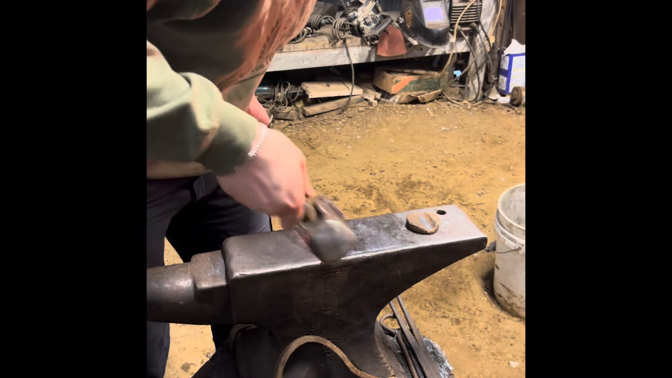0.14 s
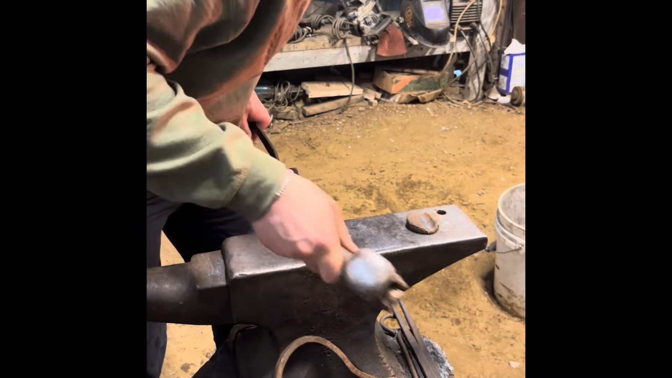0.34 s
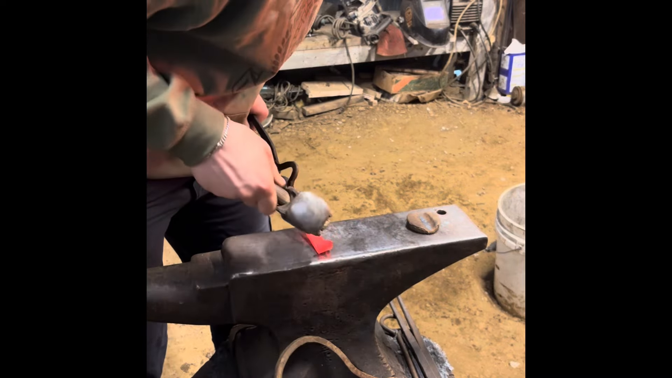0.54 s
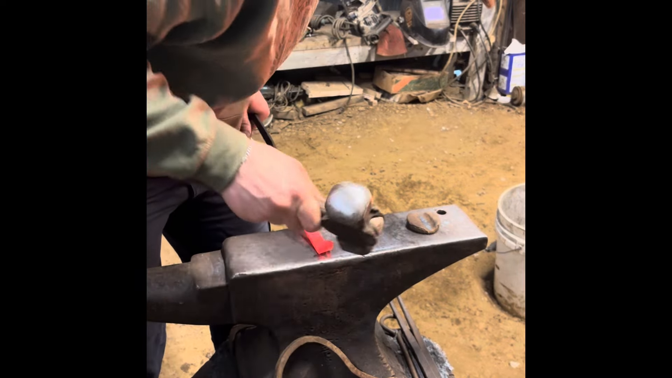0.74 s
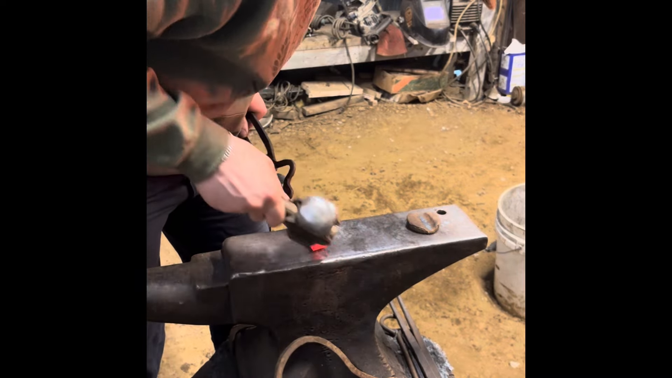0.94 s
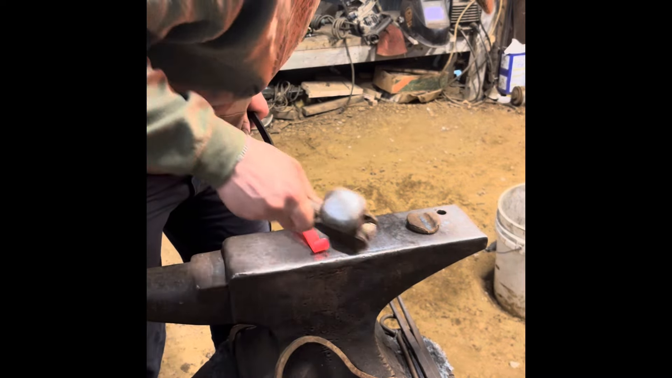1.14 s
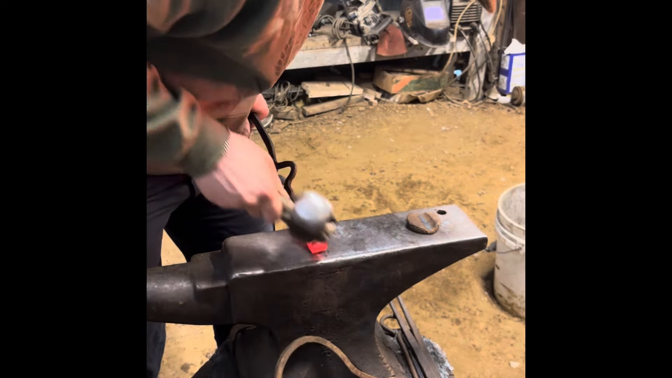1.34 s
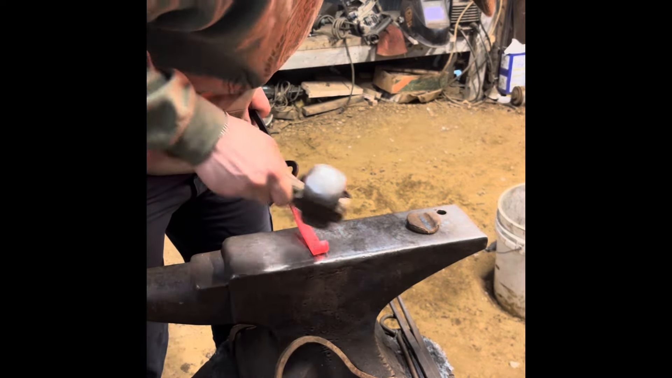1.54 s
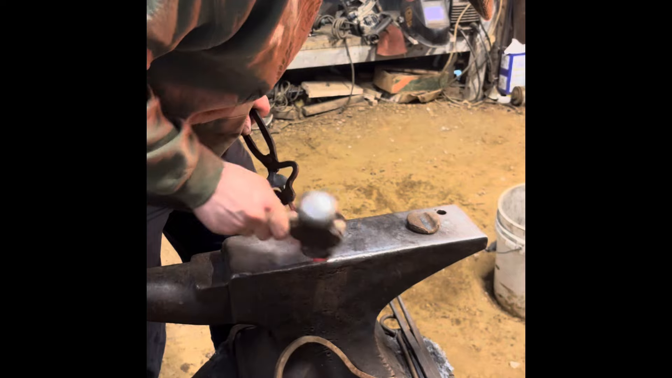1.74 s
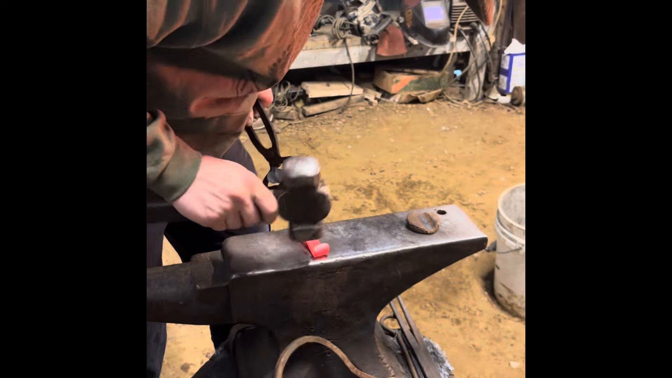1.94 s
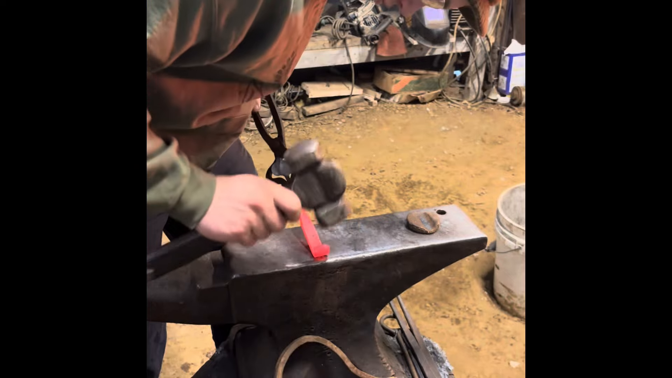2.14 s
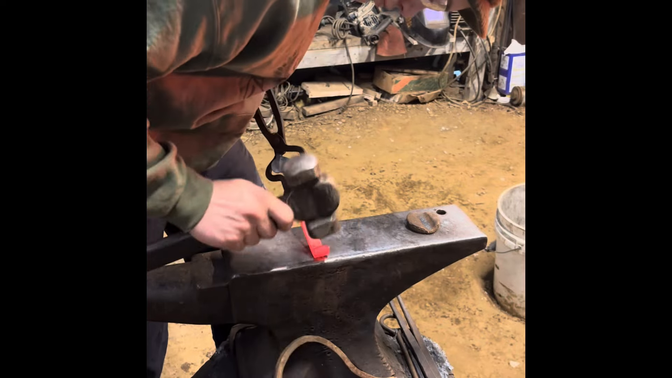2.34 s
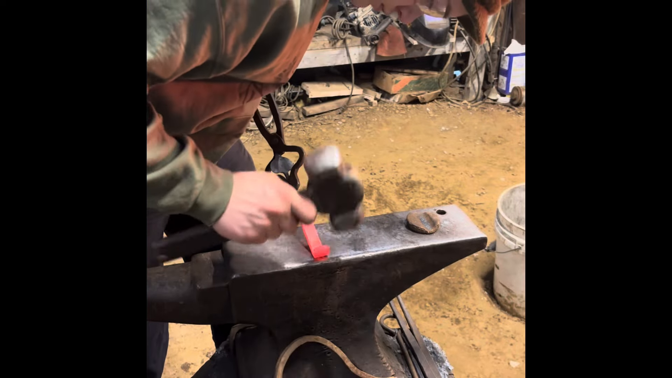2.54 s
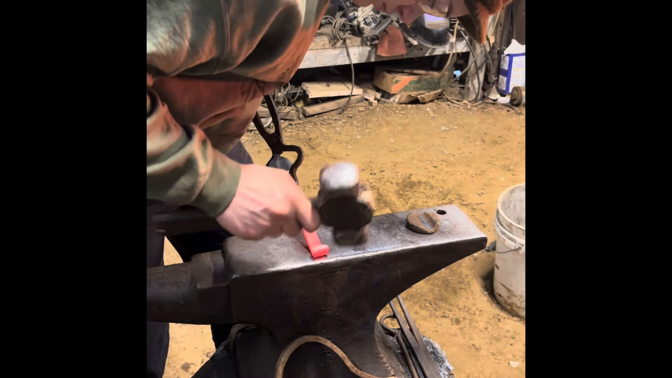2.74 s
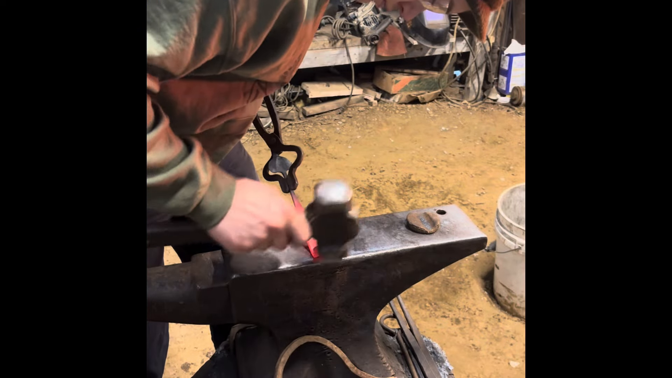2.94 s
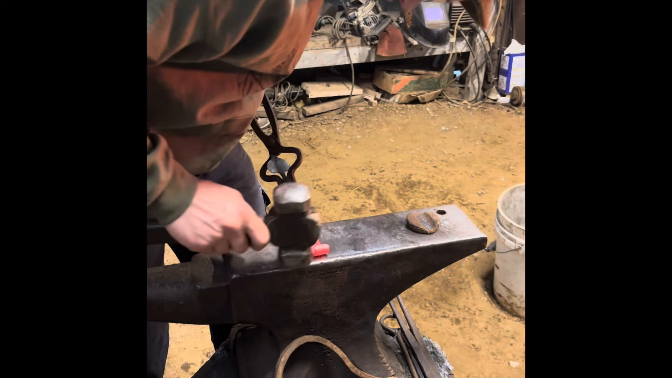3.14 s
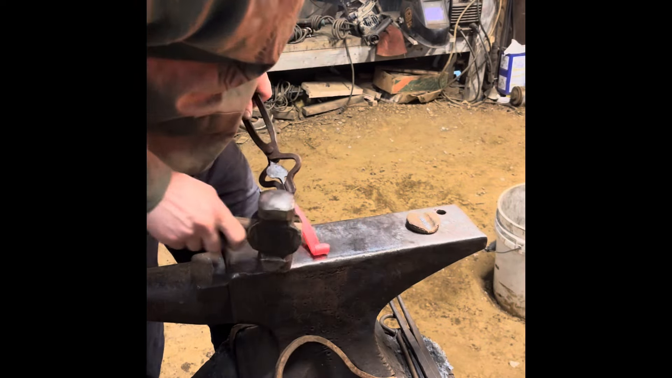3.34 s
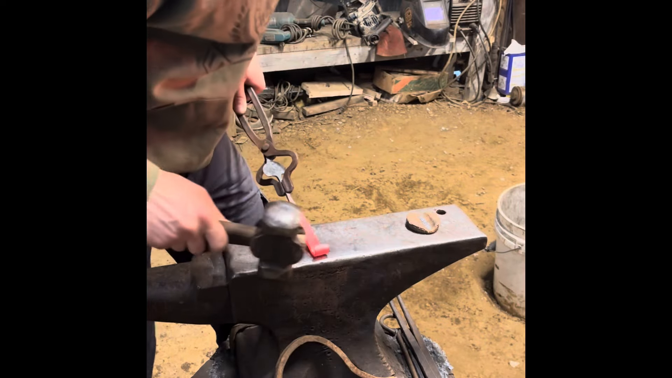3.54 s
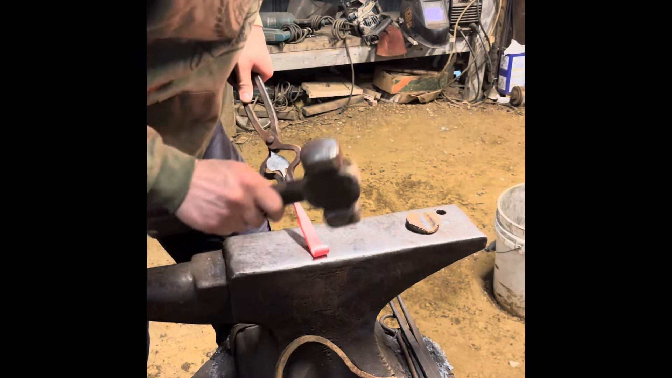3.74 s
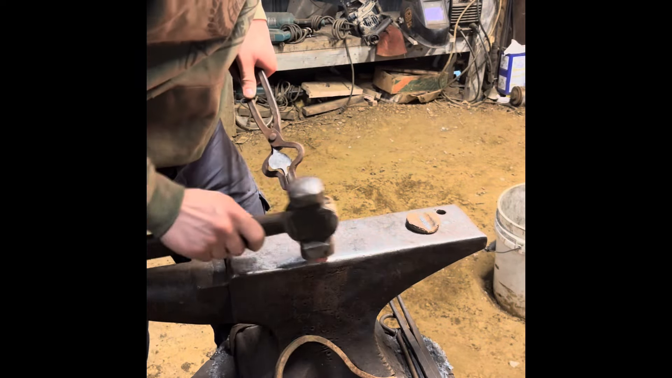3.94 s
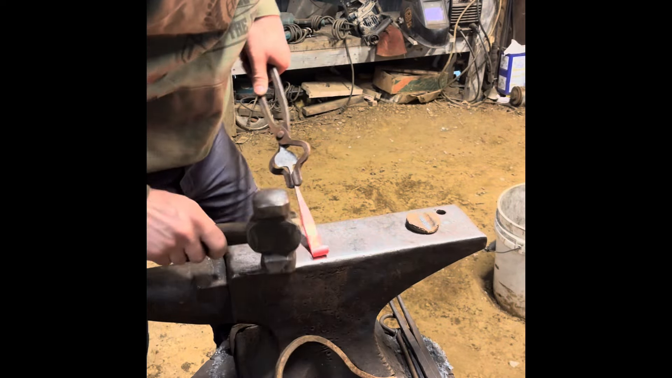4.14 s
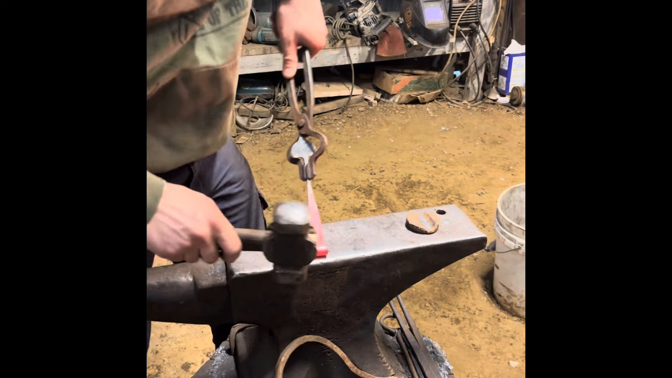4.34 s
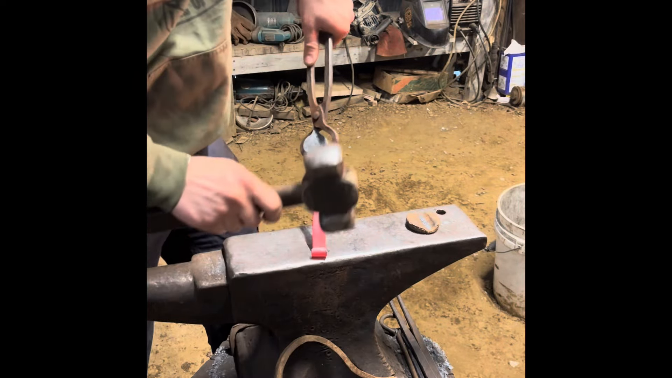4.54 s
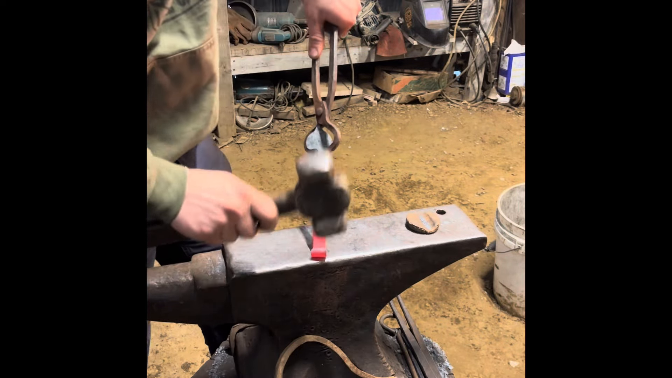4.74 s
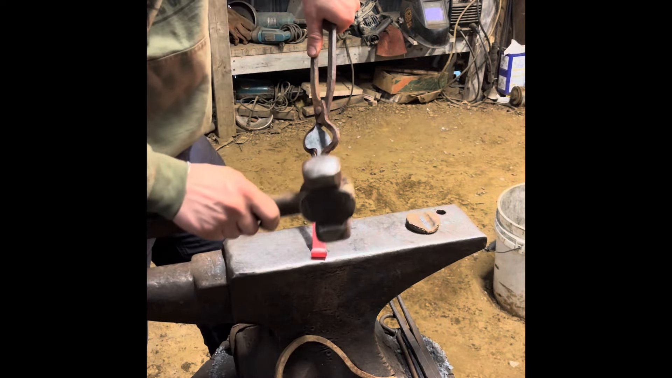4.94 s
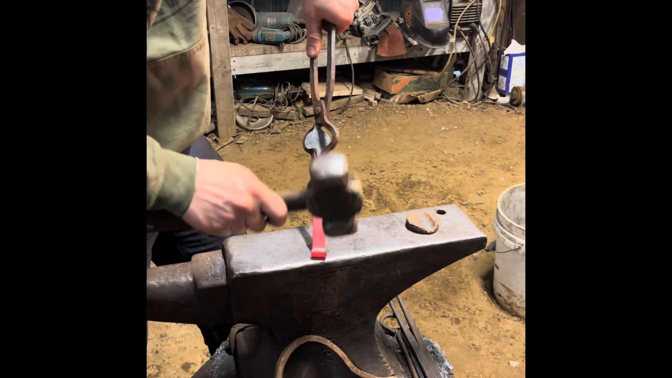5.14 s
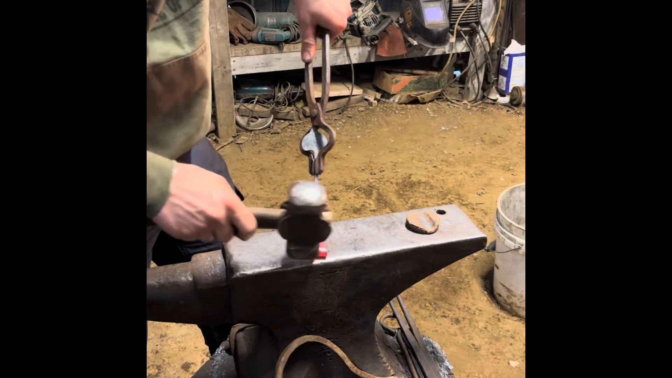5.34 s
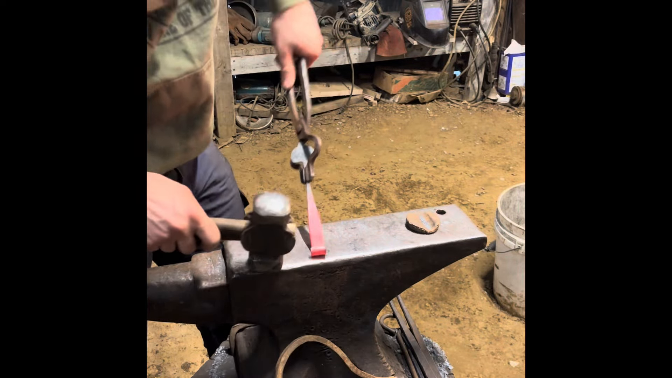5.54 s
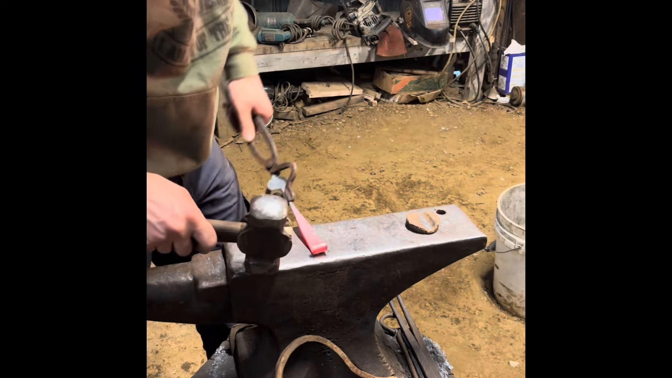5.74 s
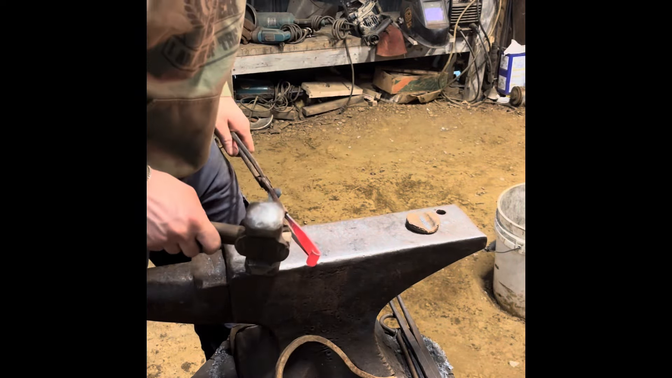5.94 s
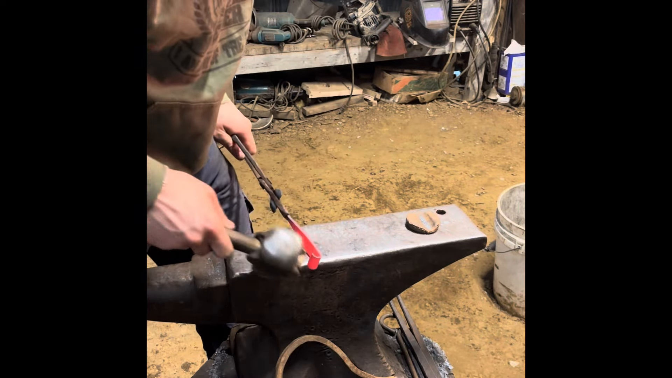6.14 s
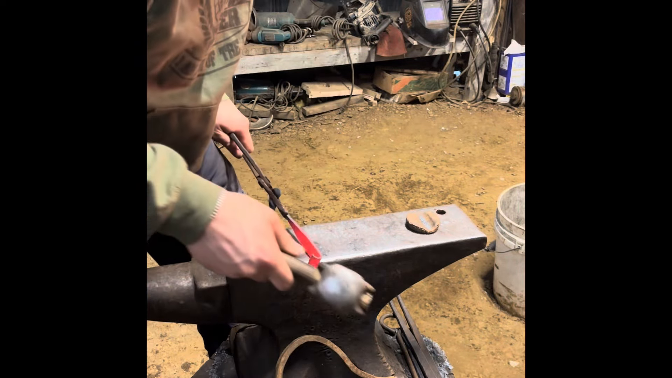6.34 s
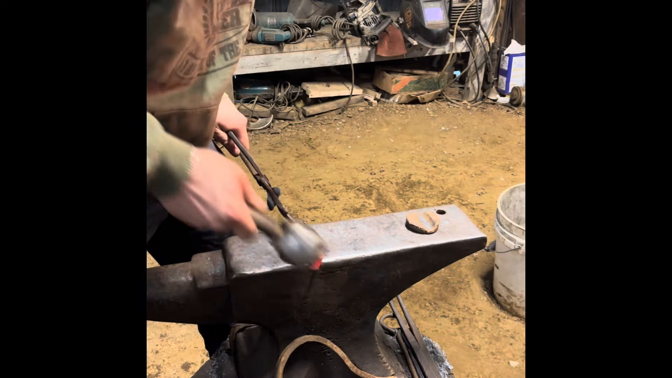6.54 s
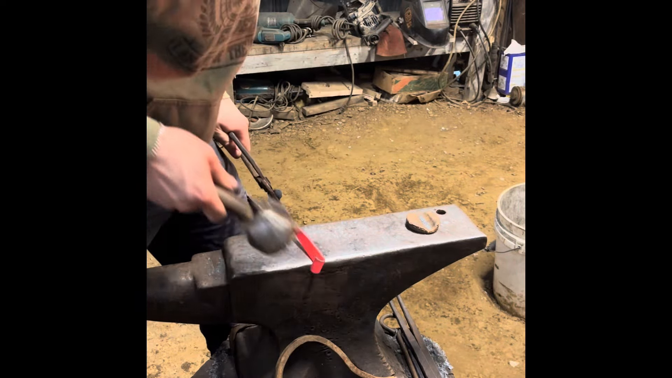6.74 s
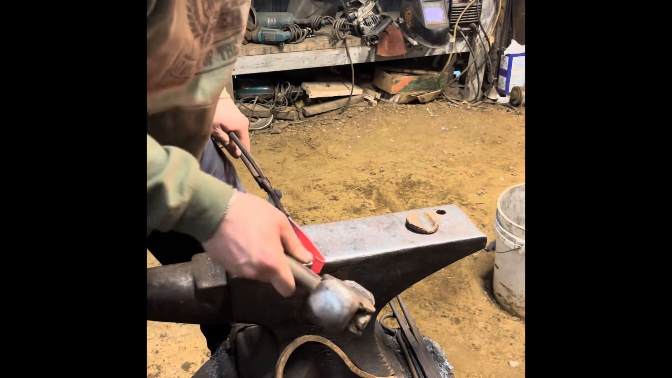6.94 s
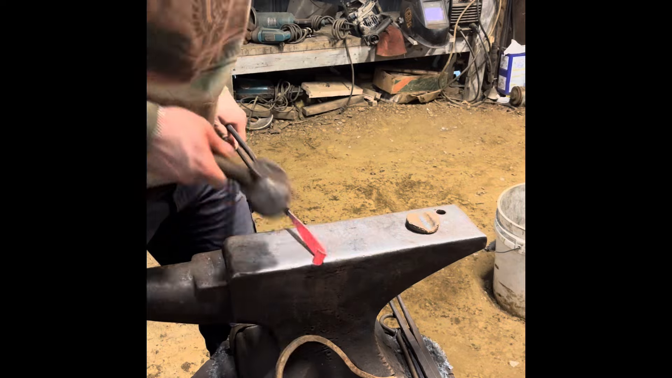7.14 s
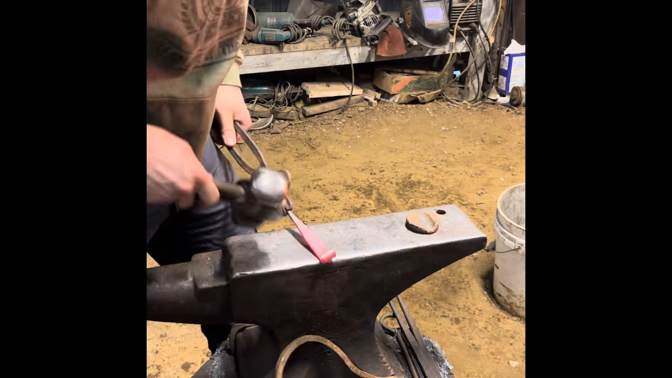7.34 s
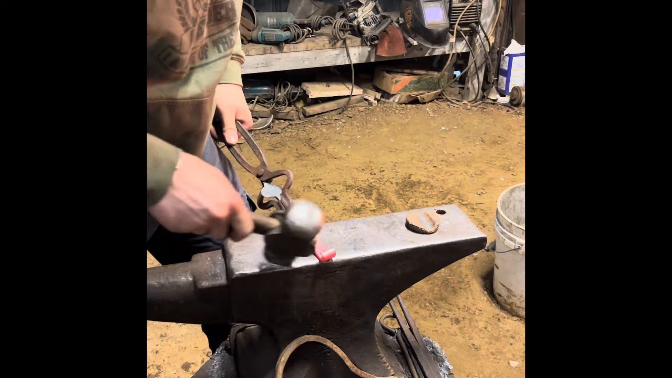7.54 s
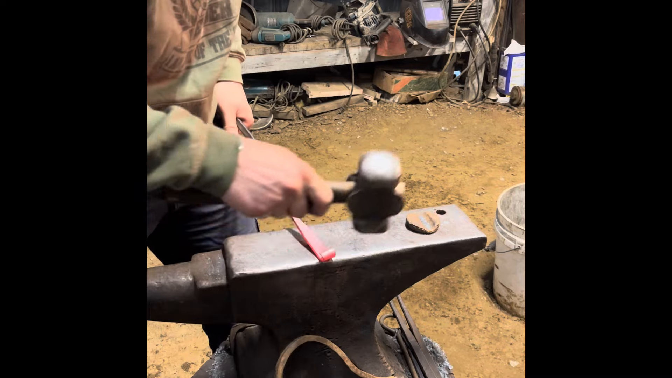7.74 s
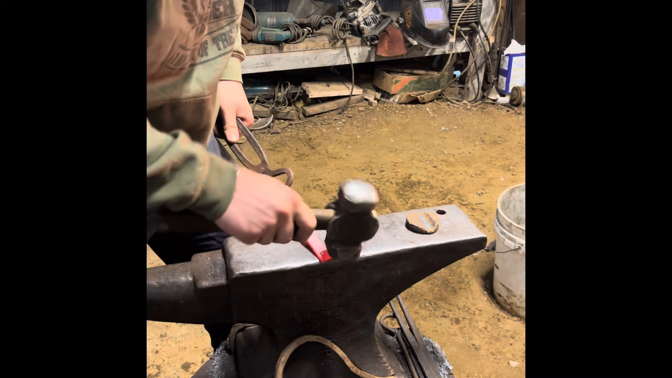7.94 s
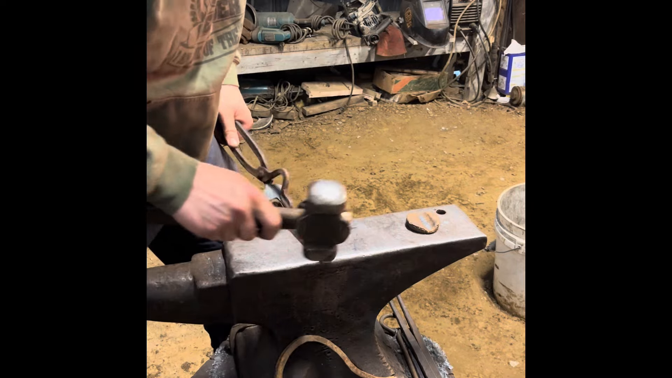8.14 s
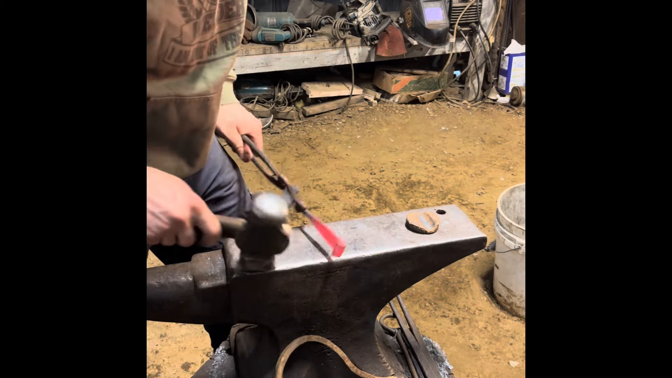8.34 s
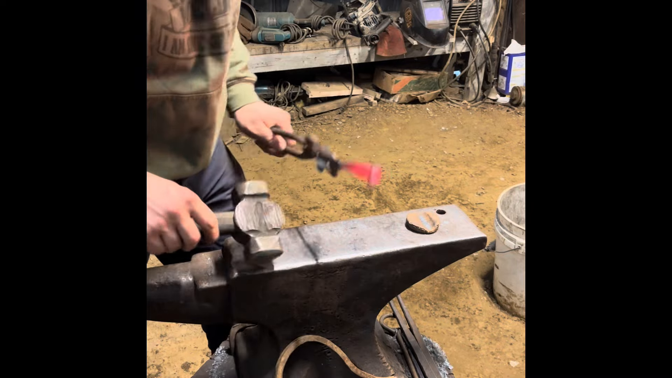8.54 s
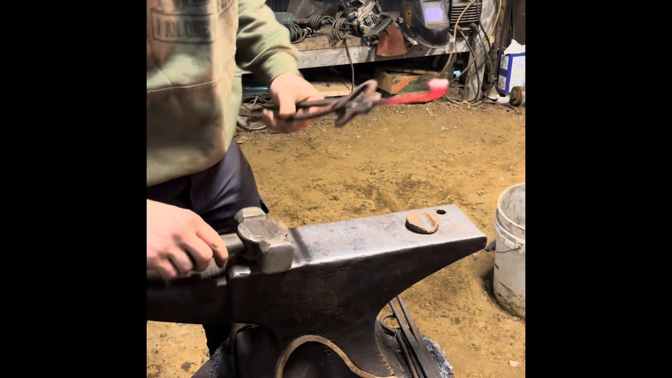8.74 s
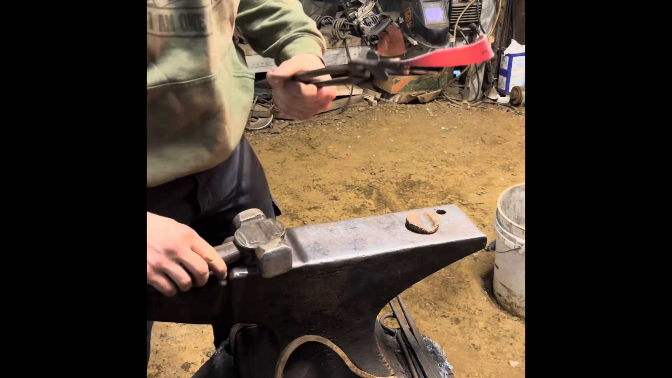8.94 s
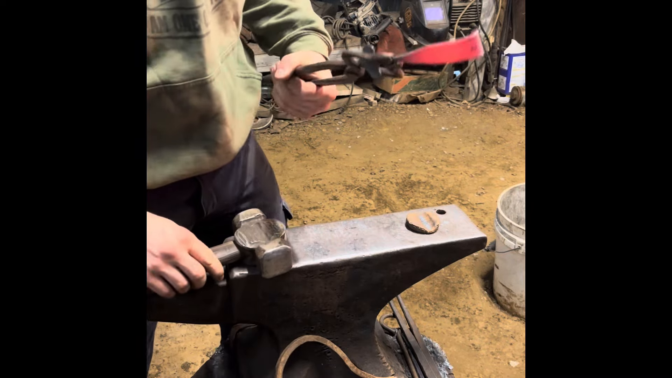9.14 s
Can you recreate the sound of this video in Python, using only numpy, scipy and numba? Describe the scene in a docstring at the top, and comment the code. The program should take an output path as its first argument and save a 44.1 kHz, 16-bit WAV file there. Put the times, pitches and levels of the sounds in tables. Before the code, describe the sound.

Close anvil work in a small shed: dead, thudding blows on a hot bar, sharp ringing hammer bounces quickening to rest, over constant forge roar.

```python
"""A smith's hammer works a hot bar on an anvil: each blow is a dead crack of noise with a low thud and a faint ring.
Between blows the hammer drops on the bare face and bounces to rest; sharp knocks start fading ring tones.
A gas forge roars close by, made of noise shaped by hollow tones, with a wavering whistle.
Fading noise gives the shed's short bright echo. Two microphone ports hear it all a little differently."""
import sys
import numpy as np
from scipy import signal
from scipy.fft import rfft, irfft, next_fast_len
from scipy.io import wavfile
from scipy.ndimage import uniform_filter1d
from numba import njit

SR = 44100
rng = np.random.default_rng(int(sys.argv[2]) if len(sys.argv) > 2 else 0)


def to_wav(sig):
    """Store sig (one row per channel, or 1-D mono) as 16-bit WAV at the path in sys.argv[1].

    Samples outside -1..1 are clipped; the rate is SR.
    """
    pcm = np.clip(np.atleast_2d(sig), -1, 1) * 32767
    pcm = np.round(pcm).astype(np.int16)
    wavfile.write(sys.argv[1], SR, pcm.T)  # frames by channels


N = 405279
EARLY = 2048  # samples of lead-in, for a blow that falls just before the start
STEP = 64  # samples for which a ring's waver value holds


def undb(db):
    """Turns decibels into a gain."""
    return 10 ** (np.asarray(db) / 20)


def along(table, hz):
    """Reads a table of (pitch_hz, value) between its rows, with pitch on a log axis."""
    pitch_hz, value = np.transpose(table)
    return np.interp(np.log(np.maximum(hz, 1)), np.log(pitch_hz), value)


def colour(x, gain):
    """Changes the strength (and timing) of each pitch in x by gain(hz)."""
    size = next_fast_len(x.shape[-1] + EARLY)
    hz = np.arange(size // 2 + 1) * SR / size
    return irfft(rfft(x, size) * gain(hz), size)[..., :x.shape[-1]]


def unit(x):
    """Scales x to an average (rms) level of 1."""
    return x / np.sqrt(np.mean(x ** 2))


def smooth_twice(x, width):
    """Smooths sudden changes with two running averages."""
    return uniform_filter1d(uniform_filter1d(x, width), width)


@njit
def ring(at, gain, turn, decay, kept, damp, swell, waver, step, length):
    """Each strike drives the modes and chokes their old ring; its damping holds until the next strike."""
    out = np.zeros((2, length))
    for m in range(len(turn)):
        # z is the ringing mode; spin turns and fades it by one sample
        z, spin, push = 0j, 0j, 0j
        choke, strike, left = 1., 0, 0
        for i in range(length):
            if strike < len(at) and i >= at[strike]:
                spin = np.exp(1j * turn[m] - decay[m] * damp[strike])
                push = gain[strike, m] / swell + 0j
                if abs(z) > 1e-6:
                    push *= z / abs(z)  # the new ring joins in step with what is left
                choke = kept[strike] ** (1 / swell)
                left = swell
                strike += 1
            if left > 0:
                z = choke * z + push
                push *= spin
                left -= 1
            elif abs(z.real) + abs(z.imag) < 1e-7:
                continue
            z *= spin
            out[0, i] += (z * waver[m, 0, i // step]).imag
            out[1, i] += (z * waver[m, 1, i // step]).imag
    return out


def wavers(hz):
    """Each mode flickers as the moving head and arm shade and reflect it; some drift between the ports."""
    waver_db, waver_per_s = 3.5, 45
    drift_rad, drift_per_s = .9, 9
    drift_low_hz, drift_high_hz = 3450, 4700  # only modes in this band drift
    steps = (N + EARLY) // STEP + 1

    def slow(rate):
        noise = rng.standard_normal((len(hz), 1, steps))
        return unit(smooth_twice(noise, int(SR / STEP / rate)))

    drifting = ((hz > drift_low_hz) & (hz < drift_high_hz))[:, None, None]
    drift = drifting * drift_rad * slow(drift_per_s)
    opposite = np.array([[1], [-1]])
    return undb(waver_db * slow(waver_per_s)) * np.exp(.5j * drift * opposite)


def anvil(s, ring_db, kept_db, damp):
    """Rings anvil and hammer head as fading modes; the spot struck changes their balance."""
    # Modes of anvil and hammer head [pitch_hz, level_db, t60_s: time to fall 60 dB at damping 1]
    modes = [(1634, 1, .24), (1634, -10, .8), (1575, -11, .12), (1997, 0, .22), (2072, -7, .15),
             (2287, 1, .15), (2287, -7, .5), (2430, -8, .15), (2690, -6, .09), (2848, -17, .15),
             (3040, -9, .08), (3337, -1, .78), (3388, -9, .2), (3500, 2, .06), (3555, -3, .2),
             (3555, -11, .7), (4393, 1, .65), (4852, 0, .22), (5006, -7, .22), (5343, -6, .24),
             (5545, -7, .6), (5881, 1, .3), (6490, -3, .16), (6609, 0, .22), (7321, -7, .18),
             (8059, 0, .26), (9130, -12, .25), (9603, -4, .2), (11450, -2, .4), (12219, 0, .7),
             (13119, -3, .4), (14860, 0, .13)]
    # Modes whose level is given for every strike [pitch_hz]
    known_hz = [1634, 1997, 2287, 3337, 3555, 4393, 4852, 6609, 8059, 12219, 14860]
    swell = 250  # samples over which a strike builds the ring
    hz, mode_db, t60 = np.transpose(modes)
    # pitches between the known ones are scattered at random by the spot struck
    spot = rng.standard_normal((len(s), len(hz))) * ~np.isin(hz, known_hz)
    strike_db = np.array([along(list(zip(known_hz, row)), hz) for row in ring_db])
    gain = undb(strike_db + mode_db + 4 * spot)
    at = (s * SR).astype(int) + EARLY
    turn = 2 * np.pi * hz / SR
    decay = np.log(1000) / (t60 * SR)
    kept = undb(np.minimum(kept_db, 0))
    return ring(at, gain, turn, decay, kept, damp, swell, wavers(hz), STEP, N + EARLY)


def crack(t, tilt):
    """Crushed scale bursts off the bar: brief noise, brighter with more tilt."""
    # Colour of the crack before tilt [pitch_hz, level_db]
    crack_colour = [(400, 26), (1500, 6.5), (3000, -2), (5000, -0.5), (7000, -1.5), (11000, -8.5),
                    (14000, -6.5), (16000, -16)]
    crack_ms, rise_s = 4.1, 0.0013
    low_hz = 700  # the small bar radiates little below this
    ms = t * 1000
    fade = np.minimum(t / rise_s, 1) * np.exp(-ms / (1.05 * crack_ms))
    fade = fade * np.clip(crack_ms + 2.0 - ms, 0, 1.5)  # silent 2 ms after crack_ms

    def tone(f):
        octaves = np.log2(np.maximum(f, 500) / 8000)
        return f ** 2 / (f ** 2 + low_hz ** 2) * undb(along(crack_colour, f) + tilt * octaves)

    return colour(rng.standard_normal(len(t)) * fade, tone)


def thud(t):
    """The blow goes down through the stand: two low tones that die away."""
    upper = np.sin(2 * np.pi * 105 * t) * np.exp(-t / 0.046)
    lower = np.sin(2 * np.pi * 66 * t) * np.exp(-t / 0.066)
    return upper + 0.34 * lower


def blows():
    """The soft bar takes the blow: crack, thud and a faint choked ring."""
    # Blows on the hot bar [start_s, crack_db, tilt_db per octave, thud_db, ring_through_db]
    bar_blows = [(-.012, -21.5, 2.5, -42.5, -9), (0.434, -16.5, 4.5, -45, -6), (0.887, -19.5, 4.5, -40, -7),
                 (1.3131, -22, 4.5, -38, -7), (1.7488, -16, 6.5, -34, -4), (2.2307, -12, 3.5, -32.5, -4),
                 (2.621, -17.5, 3.5, -31, -2.5), (2.9708, -21, 4.5, -35, 0), (3.9579, -12.5, 3, -34, -7),
                 (4.792, -9, 3.5, -33, -5.5), (5.2128, -11, 3.5, -33, -6), (6.519, -19.5, 3.5, -36, 0),
                 (7.0376, -17.5, 3.5, -45, -2), (7.9414, -21.5, 4.5, -33, -1.5)]
    # Ring through the soft bar at each known mode, before ring_through_db is added [level_db]
    choked_db = [-39, -64, -60.5, -43.5, -64.5, -68, -47, -54, -57, -56, -73]
    out, t = np.zeros(N + EARLY), np.arange(8192) / SR
    for start_s, crack_db, tilt, thud_db, _ in bar_blows:
        hit = undb(crack_db) * crack(t, tilt) + undb(thud_db) * thud(t)
        i = int(start_s * SR) + EARLY
        out[i:i + len(t)] += hit[:len(out) - i]
    s, *_, through_db = np.transpose(bar_blows)
    ring_db = np.add.outer(through_db, choked_db)
    return out, anvil(s, ring_db, np.zeros(len(s)), np.full(len(s), 2.2))


def walk(rate):
    """Random levels held 1 / rate seconds, then smoothed into slow wandering."""
    k = int(SR / rate)
    return smooth_twice(np.repeat(rng.standard_normal(N // k + 1), k), k)[:N]


def forge():
    """Flame noise sounds through the chamber's hollow tones; octave bands flutter together and alone."""
    # Colour of the burner roar, before its overall level is set [pitch_hz, level_db]
    roar = [(30, -41), (60, -25), (105, -29.5), (200, -16), (300, -7), (450, -19), (620, -26.5),
            (1000, -26.5), (1700, -31.5), (2300, -39.5), (5000, -47.5), (6500, -49), (11000, -58),
            (14500, -57.5), (16000, -91)]
    # Hollow tones of the forge chamber [pitch_hz, width_hz, level_db over the roar]
    chamber = [(130, 30.4, 14), (179.7, 8.2, 10.5), (241.2, 37.3, 8.5), (309, 24.3, 10), (347.1, 9.8, 13),
               (386.5, 28, 6), (433.5, 8.3, 11.5), (493, 13.3, 8.5), (567, 78, 13), (722, 12, 8),
               (757, 15.3, 9.5), (854, 17, 8.5), (1650, 9, 13)]
    # Slow swells of the forge [start_s, level_db]
    gust = [(0.0, -25), (1.6, -26), (2.5, -24.5), (3.7, -25.5), (4.9, -27), (5.5, -27), (6.3, -26.5),
            (9.19, -26)]
    whistle_hz, whistle_width_hz = 5010, 150  # the burner jet
    whistle_db, whistle_waver_db = 9, 3  # gain on the flame noise, and scale of its random waver
    size = next_fast_len(N)
    f = np.maximum(np.arange(size // 2 + 1) * SR / size, 1)
    tones_db = sum(db / (1 + (2 * (f - hz) / width) ** 2) for hz, width, db in chamber)
    flame = rfft(rng.standard_normal((2, size))) * undb(along(roar, f) + tones_db)
    out, flutter = 0, walk(2.1)
    for hz in 40 * 2 ** np.arange(9):
        octave = np.cos(np.pi / 2 * np.clip(np.log2(f / hz), -1, 1)) ** 2  # overlaps its neighbours
        band = irfft(flame * octave, size)[:, :N]
        out = out + band * undb(0.2 * flutter + 1.38 * walk(9))
    jet = irfft(flame / (1 + (2 * (f - whistle_hz) / whistle_width_hz) ** 2), size)[:, :N]
    out = out + jet * undb(whistle_db + whistle_waver_db * walk(4.5))
    s, db = np.transpose(gust)
    return unit(out) * undb(np.interp(np.arange(N) / SR, s, db))


def shed(x):
    """Walls answer with two unrelated tails of noise, each band fading at its own rate."""
    # Echo bands [pitch_hz, level_db, t60_s: time to fall 60 dB]
    echo_bands = [(274, 9, 0.27), (1260, -30.5, 0.48), (3620, -4, 0.33), (7300, -4.5, 0.17),
                  (14000, -44.5, 0.15)]
    start_s, rise_s = 0.0008, 0.0047  # the nearest walls
    t = np.arange(24000) / SR
    tails = 0
    for hz, db, t60 in echo_bands:
        noise = rng.standard_normal((2, len(t)))
        band = colour(noise, lambda f: np.exp(-(np.log2(np.maximum(f, 1) / hz) / 1.49) ** 2))
        even = np.sqrt(t60 * SR / (2 * np.log(1000)))  # keeps long tails from counting for more
        tails = tails + undb(db - 60 * t / t60) * band / even
    tails = tails * np.clip((t - start_s) / rise_s, 0, 1)
    return signal.fftconvolve(x[None], tails, axes=1)[:, :len(x)]


def jolt(u):
    """The stopping head jolts the air: one pulse with a dip on each side."""
    return (1 - 2 * u ** 2) * np.exp(-u ** 2)


def knock(t, contact_ms):
    """Steel stops on steel: a jolt, its reflection, a shudder and a clank; longer contact is duller."""
    sharpness = 2.21  # of the jolt against the contact time
    mirror_ms, mirror_db, mirror_widen = 0.71, -4.5, 1.78  # off the anvil face, later and duller
    clank_hz, clank_ms, clank_db = 1615, 4.1, -13.5  # the hammer head, just after the jolt
    u = sharpness * (t * 1000 / contact_ms - 2)
    mirror = jolt((u - sharpness * mirror_ms / contact_ms) / mirror_widen)
    shudder = 0.024 * np.sin(2 * np.pi * 78 * t) * np.exp(-t / 0.017)  # the stand
    late_ms = np.maximum(t * 1000 - 2 * contact_ms, 0)
    clank = np.sin(2 * np.pi * clank_hz * late_ms / 1000) * np.exp(-late_ms / clank_ms)
    return jolt(u) + undb(mirror_db) * mirror + shudder + undb(clank_db) * clank


def clatter(t, contact_ms):
    """Loose iron rattles under the knock: fading noise, duller after a long contact."""
    level_db, fade_ms = -9.5, 12
    top_hz, sharp_ms = 4300, 0.41  # contacts longer than sharp_ms lower the top
    since_ms = t * 1000 - 0.5 * contact_ms
    fade = .3 * np.exp(-since_ms / 1.1) + undb(level_db) * np.exp(-since_ms / fade_ms)
    fade = (since_ms > 0) * fade

    def tone(f):
        low = f * contact_ms / 560
        high = f * max(contact_ms / sharp_ms, 1) ** 2.7 / top_hz
        return low ** 3.11 / (1 + low ** 3) / (1 + high ** 4)

    return colour(rng.standard_normal(len(t)) * fade, tone)


def bounces():
    """The hammer bounces on the bare face: knock and clatter, then the ring."""
    # Hits on the bare face; the ring depends on the spot struck
    # [start_s, knock_db, contact_ms, then ring_db at each known mode of the anvil]
    face_hits = [(3.2085, 0, 0.334, -15.5, -24, -33, -13.5, -39, -41, -23, -30, -22, -41, -30),
                 (3.2998, -0.5, 0.33, -12.5, -26, -33, -15, -17.5, -48, -26, -30, -32, -43, -30),
                 (3.362, -4, 0.3, -17.5, -27, -30, -16.5, -20, -47, -42, -37, -37, -47, -34),
                 (3.406, -6.5, 0.54, -17, -32, -32, -50, -40, -40, -53, -34, -57, -67, -40),
                 (3.4395, -10, 0.46, -29, -40, -61, -26.5, -19, -51, -45, -39, -53, -62, -50),
                 (3.4689, -12.5, 0.48, -28, -40, -58, -39, -55, -60, -62, -62, -66, -72, -66),
                 (3.4885, -17, 0.98, -58, -39, -57, -55, -73, -60, -57, -56, -66, -74, -67),
                 (4.164, -1.5, 0.39, -11, -26, -30, -14.5, -21, -28.5, -29, -41, -34, -40, -35),
                 (4.2673, -0.5, 0.417, -17, -30, -44, -23, -26.5, -33.5, -40, -37, -43, -52, -35),
                 (4.353, -15, 0.65, -35.5, -67, -44, -37.5, -63, -63, -70, -59, -64, -71, -78),
                 (5.465, 0.5, 0.33, -18.5, -23, -25, -16, -25.5, -33.5, -37, -27, -28, -45, -40),
                 (5.558, -2, 0.36, -17, -22, -30, -36, -11.5, -35, -24, -27, -24, -47, -25),
                 (5.619, -5.5, 0.44, -24, -29, -28, -24, -26, -43, -34, -33, -39, -49, -29),
                 (5.665, -9.5, 0.437, -25, -26, -34, -39, -26, -59, -46, -37, -56, -62, -64),
                 (5.698, -11, 0.46, -28, -35, -35, -45, -50, -66, -72, -45, -64, -70, -58),
                 (5.7197, -16, 1, -49, -34, -42, -68, -71, -63, -58, -48, -64, -76, -65),
                 (5.738, -15, 0.55, -35, -38, -47, -61, -57, -69, -53, -62, -67, -68, -59),
                 (5.7535, -17, 0.74, -49, -45, -55, -69, -66, -73, -59, -65, -68, -74, -66),
                 (5.7628, -20, 0.65, -49, -48, -55, -60, -65, -71, -66, -64, -64, -72, -62),
                 (5.774, -22, 0.83, -53, -51, -62, -59, -69, -64, -54, -66, -66, -74, -58),
                 (5.7834, -30, 0.47, -61, -48, -55, -68, -59, -68, -62, -65, -70, -77, -56),
                 (7.4823, -7, 0.43, -25.5, -23.5, -52, -33.5, -59, -58, -56, -53, -37, -52, -53),
                 (8.346, -11, 0.477, -30, -51, -51, -37, -35, -65, -64, -54, -64, -67, -68),
                 (8.6274, -12.5, 0.4, -34, -25, -37, -34, -53, -52, -55, -59, -64, -68, -67),
                 (8.6623, -1, 0.25, -22, -24, -17, -27.5, -11, -30, -52, -39, -31, -47, -64),
                 (8.7659, -2.5, 0.23, -25.5, -23, -8, -32, -33, -48, -49, -43, -33, -47, -64),
                 (8.8176, -12, 0.28, -27, -19, -27, -49, -31, -50, -46, -58, -40, -62, -68),
                 (8.8493, -8, 0.28, -37, -34, -31, -41.5, -55, -60, -46, -60, -37, -60, -68),
                 (8.865, -18, 0.31, -59, -42, -45, -45, -41, -62, -65, -66, -69, -72, -66)]
    kept_db = -8  # old ring that outlasts a full-strength strike; lighter ones choke it less
    # damping factor while the head is high, chatters on the face, or rests
    flight_damp, chatter_damp, rest_damp = 1.33, 2.74, 1.3
    chatter_s, rest_s = .08, .2  # shorter flight is chatter; after a longer pause the head is at rest
    out, t = np.zeros(N + EARLY), np.arange(4096) / SR
    for start_s, db, contact_ms, *_ in face_hits:
        hit = knock(t, contact_ms) + clatter(t, contact_ms)
        # the jolt peaks .7 ms after contact
        i = int(start_s * SR) + EARLY - int((2 * contact_ms - .7) * SR / 1000)
        out[i:i + len(t)] += undb(db) * hit
    s, knock_db, _, *ring_db = np.transpose(face_hits)
    flight = np.diff(s, append=N / SR)
    damp = np.where(flight < rest_s, flight_damp, rest_damp)
    damp = np.where(flight < chatter_s, chatter_damp, damp)
    return out, anvil(s, np.transpose(ring_db), kept_db * undb(knock_db), damp)


def beam(rings):
    """Each mode beams its own way, so the ports hear it at different levels and moments."""
    # Direction of the ring [pitch_hz, left_minus_right_db, left_lead_rad beyond that of all sounds]
    directions = [(1634, -2, .6), (2287, -1, .3), (3337, -2, -.8), (3555, -2.5, .3), (4393, -4, .7),
                  (4852, 0, 0)]
    hz, lean_db, lead = np.transpose(directions)
    side = np.array([[.5], [-.5]])

    def tone(f):
        return undb(side * np.interp(f, hz, lean_db)) * np.exp(1j * side * np.interp(f, hz, lead))

    return colour(rings, tone)


def scene():
    """Adds direct sounds to echoes and roar: what the ports share, plus and minus what differs."""
    # Part of echo and roar that differs between the ports [pitch_hz, level_db]
    difference = [(60, -67), (350, -15.5), (700, -3.5), (1300, -3), (2000, -13.5), (3200, 1.5), (5000, -2),
                  (5800, -18), (7000, -6), (8200, -30), (9500, 7), (11000, -81), (12000, 4.5), (13500, -29),
                  (15000, 1)]
    crack_echo_db, knock_echo_db = -1, -4.5  # shares that the walls return
    ring_echo_db = -7.5  # the anvil beams its ring at the ports more than at the walls
    cracks, choked = blows()
    knocks, rings = bounces()
    rings = rings + choked
    to_walls = undb(crack_echo_db) * cracks + undb(knock_echo_db) * knocks
    to_walls = to_walls + undb(ring_echo_db) * rings.mean(axis=0)
    shared, apart = shed(to_walls)[:, EARLY:] + forge()
    apart = colour(apart, lambda f: undb(along(difference, f)))
    direct = (cracks + knocks + beam(rings))[:, EARLY:]
    return direct + shared + np.array([apart, -apart])


def record(dry):
    """The ports differ in level and in a lag that varies with pitch; peaks are rounded, both ends cut."""
    # Lag between the ports [pitch_hz, left_lead_rad]
    port_lead = [(20, 0), (600, -.9), (1700, 0), (2200, .9), (2800, 2.4), (3400, 1.7), (4300, 1.3),
                 (4900, .9), (5750, 3.14), (8200, 6.28), (10900, 9.42), (13400, 12.4), (15600, 15.7)]
    # Level between the ports [pitch_hz, left_minus_right_db]
    port_lean = [(350, 0.5), (700, -2.5), (2500, 0.2), (4400, -1.5), (5500, 0.2)]
    low_hz, top_hz = 45, 16450
    f, lead = np.transpose(port_lead)
    side = np.array([[.5], [-.5]])

    def tone(hz):
        return undb(side * along(port_lean, hz)) * np.exp(1j * side * np.interp(hz, f, lead))

    pair = colour(dry, tone)
    pair = signal.sosfilt(signal.butter(N=3, Wn=low_hz, btype="high", fs=SR, output="sos"), pair)
    rounded = np.tanh(0.62 * pair) / 0.57
    return signal.sosfilt(signal.ellip(10, .2, 80, top_hz, fs=SR, output="sos"), rounded)


dry = scene()
out = record(dry)
to_wav(out)
```